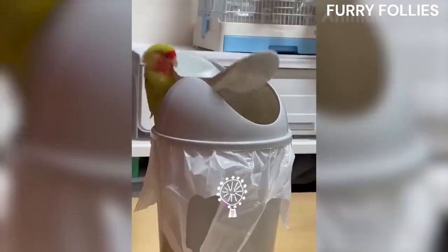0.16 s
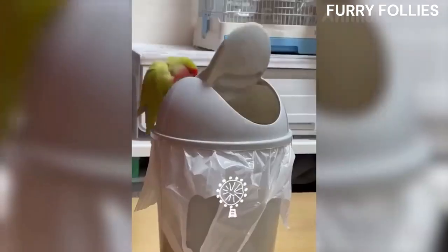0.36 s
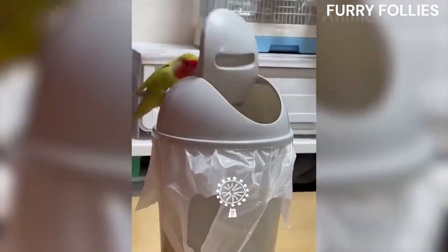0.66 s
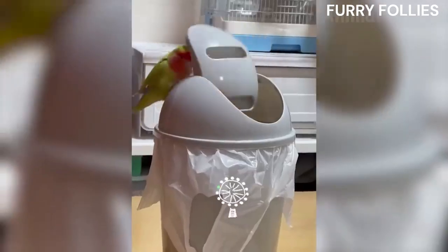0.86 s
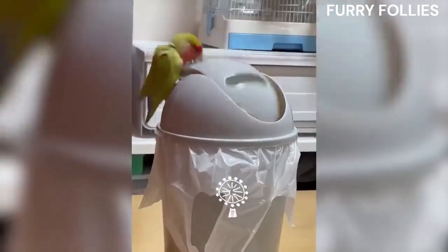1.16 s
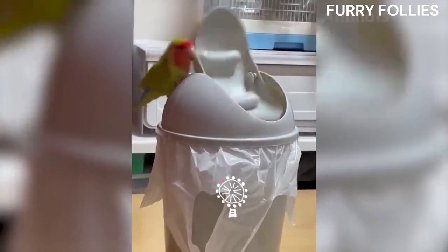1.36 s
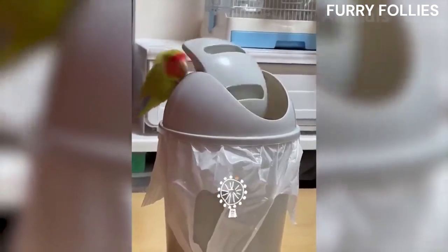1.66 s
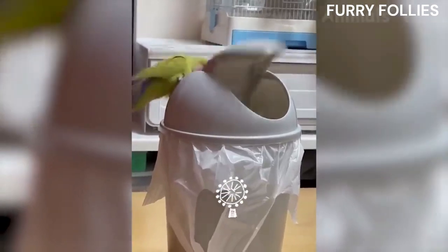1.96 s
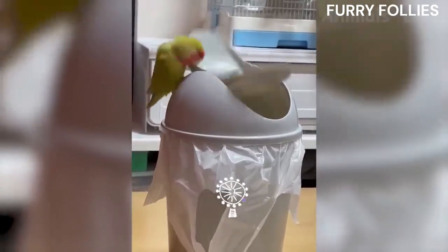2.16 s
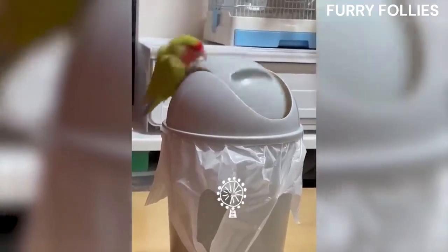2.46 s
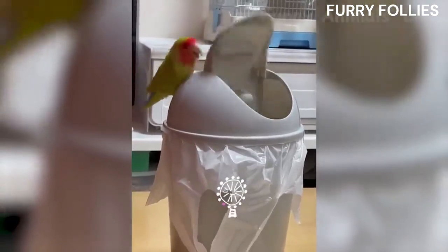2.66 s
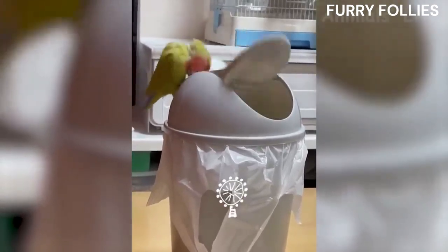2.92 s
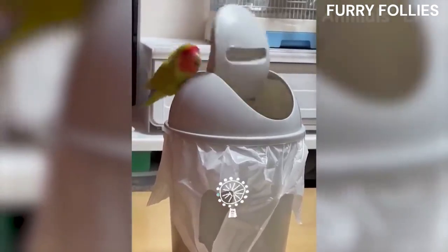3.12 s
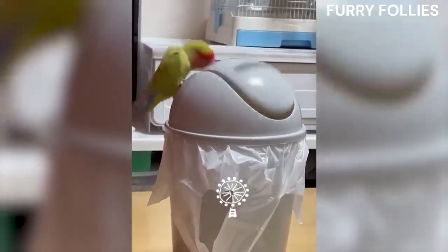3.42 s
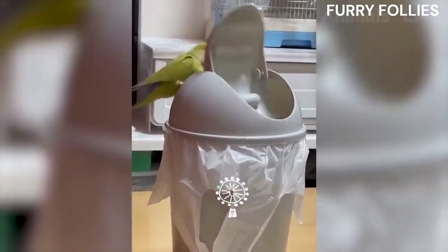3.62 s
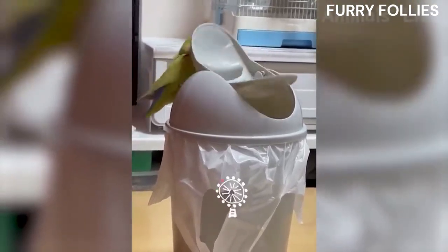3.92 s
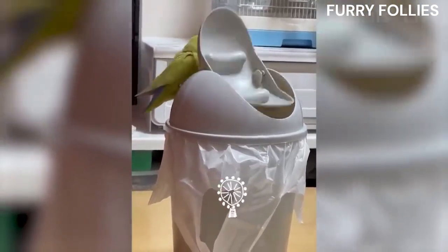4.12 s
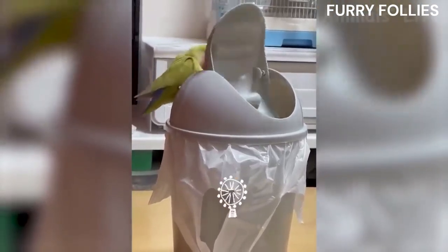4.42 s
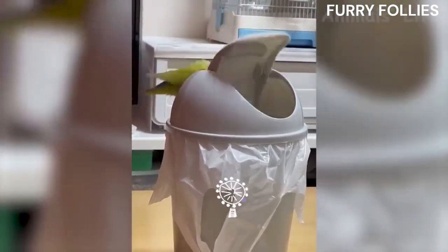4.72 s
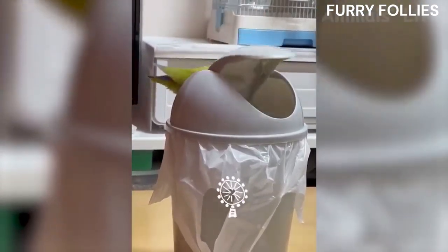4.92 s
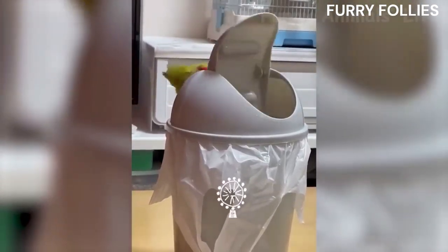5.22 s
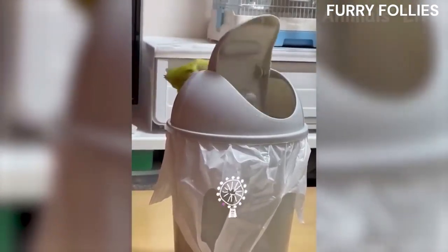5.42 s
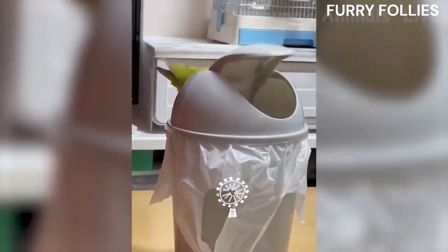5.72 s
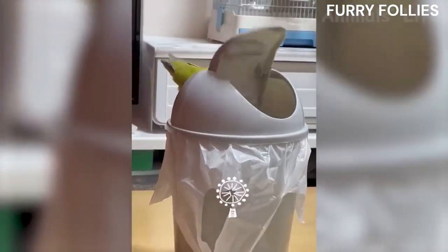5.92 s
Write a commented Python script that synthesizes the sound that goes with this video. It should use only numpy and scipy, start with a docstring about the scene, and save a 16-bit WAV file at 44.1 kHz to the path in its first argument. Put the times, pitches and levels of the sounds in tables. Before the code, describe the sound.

A small bird knocks and scrabbles at a hollow plastic bin lid, liner rustling, with quick sharp squeaks and one later raspy chirp.

```python
"""A low rumble and soft air noise come up in a small room while a lovebird climbs on a plastic swing-top bin.
Feet scrabble as many tiny touches, the liner rustles as filtered clicks, and knocks ring the hollow shell.
A brief squawk and two sharp squeaks follow, each a whistled tone with two overtones and hoarse noise.
Later one longer chirp climbs, turns rasping and falls back, then a deep drone, an unsteady sine, comes in.
Near the end the drone sinks and swells."""
import sys
import numpy as np
from scipy import signal
from scipy.fft import rfft, irfft
from scipy.io import wavfile

SR = 44100
rng = np.random.default_rng(int(sys.argv[2]) if len(sys.argv) > 2 else 0)


def master_out(mix):
    """Clip the mix to full scale and print it as 16-bit PCM to the path in sys.argv[1]."""
    frames = np.transpose(np.atleast_2d(mix))
    ceiling = np.clip(frames, -1, 1)
    pcm = np.round(ceiling * 32767).astype(np.int16)
    wavfile.write(sys.argv[1], SR, pcm)


N = 268080
TIME = np.arange(N) / SR   # seconds

# Colour of the room's low rumble: pitch_hz, level_db (relative)
RUMBLE_COLOUR = [(22, -17), (40, -5), (55, -1.5), (72, 2.5), (100, -5.5), (170, -5.5), (270, -11.5),
                 (400, -23), (700, -60)]
# Colour of the room's air noise: pitch_hz, level_db (relative)
AIR_COLOUR = [(150, -5.5), (320, 9), (600, 3), (1150, 2.5), (2200, -5), (3300, -19.5), (5000, -29),
              (9000, -36.5), (14000, -45.5)]
# Time for the room's reflections to fall by 60 dB: pitch_hz, decay_s
ROOM_DECAY = [(150, 0.21), (400, 0.11), (1000, 0.19), (3000, 0.19), (7000, 0.24), (13000, 0.11)]
# Reflections relative to the direct sound, before the wet_db of each source: pitch_hz, level_db
ROOM_LEVEL = [(150, -6), (300, -3.5), (700, 0.5), (1500, -5.5), (3000, -2), (6000, -2.5), (13000, -5)]
# Bouts of scrabbling, as the bird shoves the lid: start_s, length_s, level_db (before a trim)
BOUTS = [(1.244, 0.28, -44.5), (1.497, 0.225, -43.5), (1.948, 0.35, -44.5), (2.481, 0.19, -50.5),
         (2.968, 0.11, -42.5), (3.538, 0.23, -48)]
# Ringing tones of the bin's shell and lid: pitch_hz, level_db (relative), decay_s (to fall by 60 dB)
BIN_MODES = [(126, -20.5, 0.19), (193.3, -15, 0.23), (235.6, -10, 0.092), (289.6, -9.5, 0.11),
             (391.4, -13.5, 0.075), (497, -5.5, 0.013), (688, -10.5, 0.02), (922, -8.5, 0.0095),
             (1172, -8.5, 0.023), (1484, -9.5, 0.013), (1890, -7, 0.002), (2410, -2, .012),
             (3063, 1, 0.048), (3820, -26, .02), (4800, -6.5, 0.0057), (5894, -23.5, 0.016),
             (6130, 0.5, .014), (6700, -19.5, .012), (8900, -23, 0.018)]
# Rustles of the liner: start_s, length_s, level_db (before a trim), bright_edge_hz
RUSTLES = [(0.042, .13, -51.5, 4120), (0.615, 0.097, -64, 12100), (0.798, 0.15, -54.5, 10900),
           (1.003, 0.27, -53, 8560), (1.308, 0.071, -44.5, 6740), (1.585, 0.042, -38, 9600),
           (1.839, 0.1, -52.5, 10500), (2.127, 0.16, -55.5, 8100), (2.538, 0.15, -58, 5430),
           (2.953, 0.12, -54.5, 9400), (3.343, 0.22, -50.5, 9550), (4.648, 0.14, -61, 11100),
           (5.376, 0.076, -63.5, 10960)]
# Colour of the liner's crackle: pitch_hz, level_db (relative)
LINER_COLOUR = [(900, 2), (2800, 1.5), (5800, -4), (8500, -10.5), (12500, -6.5), (15000, -35.5)]
# Knocks on the bin: start_s, panel clack_db, hollow thump_db, hard tick_db (all before trims)
KNOCKS = [(0.117, -39, -50, -54.5), (0.178, -43.5, -44.5, -67), (0.481, -41, -39.5, -60),
          (0.944, -49, -51, -65), (1.028, -32.5, -41.5, -69), (1.09, -44, -51, -58),
          (1.133, -51, -49, -44.5), (1.157, -45, -59, -45.5), (1.243, -49, -29, -57),
          (1.29, -28, -41.5, -45.5), (1.341, -35.5, -38, -58), (1.388, -38, -48, -60),
          (1.424, -39, -44, -43), (1.449, -42, -39, -44.5), (1.511, -26.5, -20.5, -28),
          (1.646, -38, -40, -30.5), (1.664, -25, -32.5, -39), (1.688, -33.5, -31, -46.5),
          (1.714, -31, -42, -54), (1.766, -44.5, -45, -46.5), (1.781, -47, -42, -48),
          (1.861, -44.5, -36.5, -44), (1.943, -53, -33, -51), (2.001, -33.5, -37.5, -56),
          (2.041, -35.5, -39, -56), (2.077, -47, -67, -45), (2.134, -30, -62, -44), (2.173, -37, -37, -58),
          (2.24, -40, -34, -51.5), (2.258, -35, -26, -43), (2.41, -38, -51, -59.5),
          (2.422, -34, -44, -56.5), (2.505, -36.5, -36, -45.5), (2.549, -67, -31, -42),
          (2.63, -31, -37.5, -45.5), (2.695, -50, -35, -76), (2.776, -35, -37.5, -44),
          (2.845, -48.5, -45.5, -54), (2.901, -38, -34, -59), (3.026, -41, -28, -45.5),
          (3.04, -32.5, -32, -41.5), (3.27, -48, -37, -43), (3.297, -36, -38, -52.5),
          (3.434, -48, -34, -36.5), (3.531, -34, -36, -56), (3.707, -32, -47.5, -65),
          (3.816, -52, -32.5, -36), (4.724, -47.5, -37.5, -71.5), (4.887, -67.5, -32.5, -74),
          (5.091, -39.5, -36, -66.5), (5.958, -32.5, -33, -52)]
# Colour of the crack as claw or beak lands: pitch_hz, level_db (relative)
CRACK_COLOUR = [(800, 7), (3000, 10.5), (5800, 4), (8500, -6), (10500, -30.5), (15000, -56.5)]
# Throat and open beak, which colour the hoarse noise: pitch_hz, level_db (relative)
THROAT_COLOUR = [(1200, -45.5), (1800, -15), (2400, 0), (3100, 7.5), (4500, 2), (5900, -16), (6700, -34.5),
                 (8300, -4), (10000, -16), (13000, -59.5)]
# Short cries: start_s, length_s, level_db, start_hz, crest_hz, end_hz,
# second_harmonic_db, third_harmonic_db, hoarseness_db (these three relative), unsteadiness (multiplier)
CRIES = [(1.312, .011, -26.5, 2288, 2474, 2900, -19, -31.5, -3.5, 1.5),
         (1.479, .033, -20, 2395, 2772, 2274, 6.5, -7.5, -6.5, 1.4),
         (1.593, .041, -34, 2380, 2596, 2609, 17.5, -5.5, 3, .3)]
# The long chirp, from a soft note up to its peak and down again: start_s, pitch_hz, level_db (before a trim)
CHIRP_PATH = [(4.022, 1880, -47), (4.042, 1780, -42), (4.058, 1850, -42), (4.067, 2350, -27),
              (4.076, 3050, -28), (4.1, 3600, -29), (4.118, 4150, -27), (4.138, 3300, -29),
              (4.15, 3080, -22), (4.177, 3030, -31)]
# The chirp's breathy rasp at each pitch: pitch_hz, level_db (before the chirp's trim)
RASP = [(1850, -62), (2400, -43.5), (3100, -46.5), (4150, -30.5)]

# Room noise comes up at first
RUMBLE_START_DB, RUMBLE_DB, AIR_START_DB, AIR_DB, NOISE_RISE_S = -53.5, -50, -88, -58.5, 1.01
# Footwork: a light shuffle, quieter once the bird leans into the bin
SHUFFLE_DB, LEANS_IN_S, LEANING_DB = -59, 3.9, -67.5
BOUT_ATTACK_S, BOUT_RELEASE_S = 0.021, 0.012
# The loose lid touches again, weaker: delay, random share of the delay, loss of (clack, thump, tick)
REBOUND_S, REBOUND_SPREAD, REBOUND_LOSS_DB = 0.021, 0.13, (13, 5, 13)
# Stray claw taps: (clack, thump, tick) relative to the footwork
TAPS_PER_S, TAP_DB, TAP_SPREAD_DB = 16, (-6, -6.5, -17.5), 3.5
# Parts of each cry, as shares of its length
CRY_ATTACK_SHARE, CRY_RELEASE_SHARE, CRY_CREST_SHARE = 0.35, 0.25, 0.31
# Chirp: fade at each end, overtones relative to the main tone, and their weakening with pitch
CHIRP_EDGE_S, CHIRP_SECOND_DB, CHIRP_THIRD_DB, PURITY_DB_PER_OCTAVE = 0.004, -15.5, -14, 30
BEAK_NOTCH_HZ, BEAK_LOW_HZ, BEAK_CUT_HZ = 6900, 1400, 9500
# The drone comes in late, then sinks and swells
DRONE_START_S, DRONE_RISE_S, DRONE_DB = 4.13, 0.347, -56
DRONE_HZ, DRONE_SINKS_S, DRONE_SINK_S, DRONE_LOW_HZ, DRONE_SWELL_DB = 66.5, 5.42, 0.4, 53.5, 9
CUTOFF_HZ = 14300


def from_db(db):
    """Turn decibels into a gain."""
    return 10 ** (np.asarray(db) / 20)


def rms_one(x):
    """Scale to an average strength (rms) of 1."""
    return x / np.sqrt(np.mean(x ** 2) + 1e-20)


def in_time(rows, t=TIME):
    """Join each column of a timed table by straight lines."""
    s, *columns = np.transpose(rows)
    return [np.interp(t, np.sort(s), column) for column in columns]


def at_hz(points, hz):
    """Read a table at the given pitch, with octaves evenly spaced."""
    f, value = np.transpose(points)
    return np.interp(np.log(np.maximum(hz, 1)), np.log(f), value)


def ramp(start_s, length_s, t=TIME):
    """Rise from 0 to 1."""
    return np.clip((t - start_s) / length_s, 0, 1)


def gate(s, length, attack_s, release_s):
    """Fade in, hold and fade out within the given length."""
    return ramp(s, attack_s) * (1 - ramp(s + length - release_s, release_s))


def coloured(x, spectrum):
    """Filter to the given colour, with no sound before its cause (minimum phase) and unit power gain."""
    size = 8192
    gain = rms_one(from_db(at_hz(spectrum, np.fft.rfftfreq(size, 1 / SR))))
    cepstrum = irfft(np.log(gain))
    fold = 1 + np.sign(size / 2 - np.arange(size))
    fold[0] = 1
    response = irfft(np.exp(rfft(cepstrum * fold)))
    return signal.oaconvolve(x, response)[:len(x)]


def wander(rate_hz, count):
    """Smooth random drift with a spread of 1; a second of run-in is dropped."""
    sos = signal.butter(2, rate_hz, fs=SR, output="sos")
    return rms_one(signal.sosfilt(sos, rng.standard_normal(count + SR))[SR:])


def clicks_at(times, heights):
    """Place single-sample clicks at the given seconds."""
    out = np.zeros(N)
    np.add.at(out, np.clip(np.round(times * SR).astype(int), 0, N - 1), heights)
    return out


def grains(per_s, spread_db):
    """Random clicks of uneven size and sign, with rms 1."""
    sizes = from_db(spread_db * np.minimum(rng.exponential(1, N), 3))
    sizes = sizes * rng.choice([-1, 1], N)
    return rms_one(sizes * (rng.random(N) < per_s / SR))


def ring(clicks, hz, t60):
    """A click of height 1 starts a sine of height 1, which dies away by 60 dB in t60 seconds."""
    r = np.exp(-np.log(1000) / (t60 * SR))
    w = 2 * np.pi * hz / SR
    return signal.lfilter([0, np.sin(w)], [1, -2 * r * np.cos(w), r * r], clicks + 1e-18)


def background(side_db=-20):
    """Low rumble, alike in both channels, and air noise that differs slightly between them."""
    rumble_db, air_db = in_time([(0, RUMBLE_START_DB, AIR_START_DB), (NOISE_RISE_S, RUMBLE_DB, AIR_DB)])
    colours = (RUMBLE_COLOUR, AIR_COLOUR, AIR_COLOUR)
    rumble, air, side = (coloured(rng.standard_normal(N + SR), colour)[SR:] for colour in colours)
    wide_air = air + from_db(side_db) * side * np.array([[1], [-1]])
    noise = from_db(rumble_db) * rumble + from_db(air_db) * wide_air
    return signal.sosfilt(signal.butter(3, 38, "high", fs=SR, output="sos"), noise)


def room(x, wet_db, side_db=-14, first_s=0.0013, build_s=0.001):
    """Dense reflections from nearby walls and furniture die band by band, differing a little left to right."""
    t = np.arange(SR // 2) / SR
    edges = np.geomspace(90, 16000, 12)
    build = 1 - np.exp(-np.maximum(t - first_s, 0) / build_s)
    response = np.zeros((2, len(t)))   # middle and side
    for low, high in zip(edges, edges[1:]):
        hz = np.sqrt(low * high)
        sos = signal.butter(3, [low, high], "band", fs=SR, output="sos")
        band = signal.sosfilt(sos, rng.standard_normal((2, len(t))))
        band = band * build * np.exp(-np.log(1000) * t / at_hz(ROOM_DECAY, hz))
        # give each band the energy that its width calls for
        band = band * np.sqrt(2 * (high - low) / SR / np.sum(band ** 2, axis=1, keepdims=True))
        band[1] *= from_db(side_db + at_hz([(150, -44.5), (400, 0), (2500, -8), (5000, 6.5)], hz))
        response += band * from_db(at_hz(ROOM_LEVEL, hz) + wet_db)
    mid, side = signal.fftconvolve(x[None], response, axes=1)[:, :N]
    return x + np.array([mid + side, mid - side])


def effort():
    """Gain of the footwork: each bout starts quickly, holds and dies away over a light shuffle."""
    gain = from_db(np.where(TIME < LEANS_IN_S, SHUFFLE_DB, LEANING_DB))
    for s, length, db in BOUTS:
        fall = np.exp(-np.maximum(TIME - s - length, 0) / BOUT_RELEASE_S)
        gain = gain + from_db(db) * ramp(s, BOUT_ATTACK_S) * fall
    return gain


def scrabble(per_s=90, spread_db=3, soft_hz=1500, trim_db=-2):
    """Many light, soft touches of the feet ring the bin, mostly in its lower tones."""
    touches = grains(per_s, spread_db)
    at = np.flatnonzero(touches)
    shell = np.zeros(N)
    for hz, db, t60 in BIN_MODES:
        softness = 1 / (1 + (hz / soft_hz) ** 4)
        clicks = clicks_at(at / SR, touches[at] * rng.standard_normal(len(at)))
        shell += from_db(db) * softness * ring(clicks, hz, t60)
    return from_db(trim_db) * effort() * rms_one(shell)


def liner(per_s=1200, spread_db=5, clump_db=3, trim_db=-1):
    """Thin film crackles in short swells; its creases give way in clumps."""
    creases = grains(per_s, spread_db)
    clumps = from_db(clump_db * wander(59.96, N))
    crackle = coloured(creases * clumps, LINER_COLOUR)
    out = np.zeros(N)
    for s, length, db, edge_hz in RUSTLES:
        inside = (TIME >= s) & (TIME < s + length)
        swell = from_db(db + trim_db) * np.sin(np.pi * (TIME[inside] - s) / length)
        sos = signal.butter(4, min(edge_hz, CUTOFF_HZ), fs=SR, output="sos")
        out[inside] += swell * signal.sosfilt(sos, crackle[inside])
    return out


def contacts():
    """List every knock, its rebound, and stray taps that follow the footwork, in the columns of KNOCKS."""
    first = np.array(KNOCKS)
    delay = REBOUND_S * (1 + REBOUND_SPREAD * rng.standard_normal(len(first)))
    again = np.column_stack([first[:, 0] + delay, first[:, 1:] - REBOUND_LOSS_DB])
    at = np.flatnonzero(rng.random(N) < TAPS_PER_S / SR)
    effort_db = 20 * np.log10(effort()[at, None])
    tap_db = effort_db + TAP_DB + TAP_SPREAD_DB * rng.standard_normal((len(at), 3))
    return np.vstack([first, again, np.column_stack([at / SR, tap_db])])


def knocks(rows, thump_db=9, clack_db=13, tick_db=1, crack_db=9, crack_s=0.0013, uneven_db=2,
           detune=0.077, bend_lag_s=0.0011, firm_db=-36, dulling=0.48):
    """Contacts ring one spot of the bin; bending waves are slower in the bass, so the thump follows the tick."""
    s, clack, thump, tick = np.transpose(rows)
    chance = rng.standard_normal((len(s), len(BIN_MODES)))
    softness_db = dulling * np.minimum(tick - firm_db, 0)   # light touches lose treble
    out = np.zeros(N)
    for k, (hz, level_db, t60) in enumerate(BIN_MODES):
        # the thump drives the low tones, the clack the middle and the tick the high ones
        low = at_hz([(400, 0.82), (720, 0.034)], hz)
        high = at_hz([(1600, 0.06), (2800, 0.82)], hz)
        force_db = low * (thump + thump_db) + high * (tick + tick_db)
        force_db = force_db + (1 - low - high) * (clack + clack_db)
        force_db = force_db + softness_db * max(np.log2(hz / 3500), 0)
        heights = from_db(force_db + level_db + uneven_db * chance[:, k]) * (-1) ** k
        # upper tones lie close together: each spot wakes a slightly different one
        spot_hz = hz * (1 + detune * (high + 1 - low) / 2 * (2 * rng.random() - 1))
        lag_s = bend_lag_s * np.sqrt(1000 / hz)
        out += ring(clicks_at(s + lag_s, heights), spot_hz, t60)
    # claw or beak skids for a moment as it lands: noise that rises and dies quickly
    r = np.exp(-1 / (crack_s * SR))
    crack = np.zeros(N)
    grit = rng.standard_normal(N)
    for side, level_db in (("low", tick), ("high", tick + softness_db)):
        landings = clicks_at(s, from_db(level_db + crack_db))
        skid = signal.lfilter([(1 - r) * np.e], [1, -2 * r, r * r], landings + 1e-18)
        crack += skid * signal.sosfilt(signal.butter(3, 5500, side, fs=SR, output="sos"), grit)
    return out + coloured(crack, CRACK_COLOUR)


def handling(wet_db=1, count=5):
    """Knocks land on several spots of lid and shell, each with its own paths through the room."""
    rows = contacts()
    spots = sum(room(knocks(rows[k::count]), wet_db) for k in range(count))
    return spots + room(scrabble() + liner(), wet_db)


def call(envelope, pitch, overtones_db, hoarse_db, jitter, flutter, flutter_hz, buzz, buzz_hz):
    """A whistle with two overtones; an unsteady syrinx (voice organ) shakes it and adds hoarse noise."""
    phase = 2 * np.pi * np.cumsum(pitch * (1 + jitter * wander(flutter_hz, N))) / SR
    whistle = np.zeros(N)
    for k, db in enumerate([0, *overtones_db]):
        whistle += np.sqrt(2) * from_db(db) * np.sin((k + 1) * phase)
    shake = envelope * (1 + flutter * wander(flutter_hz, N)) / np.hypot(1, flutter)
    # when the voice is strained, a slower second vibration splits the tone into strands
    depth = buzz * np.minimum(from_db(hoarse_db), 1)
    slow = np.sin(2 * np.pi * buzz_hz * np.cumsum(1 + 0.12 * wander(79.2, N)) / SR)
    tone = whistle * shake * (1 + depth * slow) / np.sqrt(1 + depth ** 2 / 2)
    breath = from_db(hoarse_db) * shake * rng.standard_normal(N)
    return tone + coloured(breath, THROAT_COLOUR)


def cries(jitter=0.035, flutter=0.3, flutter_hz=470, buzz=0.35, buzz_hz=466):
    """A brief squawk, a harsh squeak and a steadier one; each swoops up to a crest and on to its end pitch."""
    out = np.zeros(N)
    for s, length, db, start_hz, crest_hz, end_hz, second_db, third_db, hoarse_db, unsteady in CRIES:
        pitch = np.interp(ramp(s, length), [0, CRY_CREST_SHARE, 1], [start_hz, crest_hz, end_hz])
        envelope = from_db(db) * gate(s, length, CRY_ATTACK_SHARE * length, CRY_RELEASE_SHARE * length)
        out += call(envelope, pitch, (second_db, third_db), hoarse_db,
                    jitter * unsteady, flutter, flutter_hz, buzz * unsteady, buzz_hz)
    return out


def chirp(trim_db=-1, jitter=0.0326, flutter=0.22, flutter_hz=298, buzz=1.8, buzz_hz=755):
    """One longer call: the higher its pitch, the weaker its overtones, and the rasp is strongest at the peak."""
    pitch, db = in_time(CHIRP_PATH)
    start, end = CHIRP_PATH[0][0], CHIRP_PATH[-1][0]
    envelope = from_db(db + trim_db) * gate(start, end - start, CHIRP_EDGE_S, CHIRP_EDGE_S)
    fade_db = PURITY_DB_PER_OCTAVE * np.log2(pitch / pitch[0])
    overtones_db = (CHIRP_SECOND_DB - fade_db / 2, CHIRP_THIRD_DB - fade_db)   # the second fades half as fast
    hoarse_db = at_hz(RASP, pitch) - db   # relative to the tone
    return call(envelope, pitch, overtones_db, hoarse_db, jitter, flutter, flutter_hz, buzz, buzz_hz)


def bird():
    """All calls leave through the beak, whose hollow cancels one pitch and passes little above its top resonance."""
    notch = signal.iirnotch(BEAK_NOTCH_HZ, 6, fs=SR)
    voice = signal.lfilter(*notch, cries() + chirp() + 1e-18)
    return signal.sosfilt(signal.butter(4, [BEAK_LOW_HZ, BEAK_CUT_HZ], "band", fs=SR, output="sos"), voice)


def drone(waver=0.0706, uneven_db=2):
    """A deep sine, unsteady in pitch and level, that grows as it sinks."""
    sunk = ramp(DRONE_SINKS_S, DRONE_SINK_S)
    hz = DRONE_HZ + (DRONE_LOW_HZ - DRONE_HZ) * sunk
    phase = 2 * np.pi * np.cumsum(hz * (1 + waver * wander(16.3, N))) / SR
    level_db = DRONE_DB + DRONE_SWELL_DB * sunk + uneven_db * wander(3.1, N)
    gain = ramp(DRONE_START_S, DRONE_RISE_S) * from_db(level_db)
    return np.sqrt(2) * gain * np.sin(phase)


def scene():
    """Bin and bird sound into the same room, over its noise and the drone."""
    return handling() + room(bird(), wet_db=-2.0) + background() + drone()


def record(dry):
    """Cut the top steeply: 60 dB down from 500 Hz above the cutoff."""
    return signal.sosfilt(signal.cheby2(14, 60, CUTOFF_HZ + 500, fs=SR, output="sos"), dry)


dry = scene()
out = record(dry)
master_out(out)
```